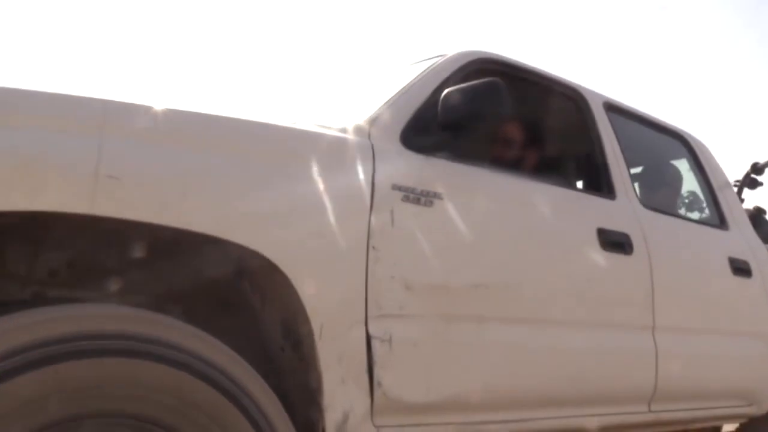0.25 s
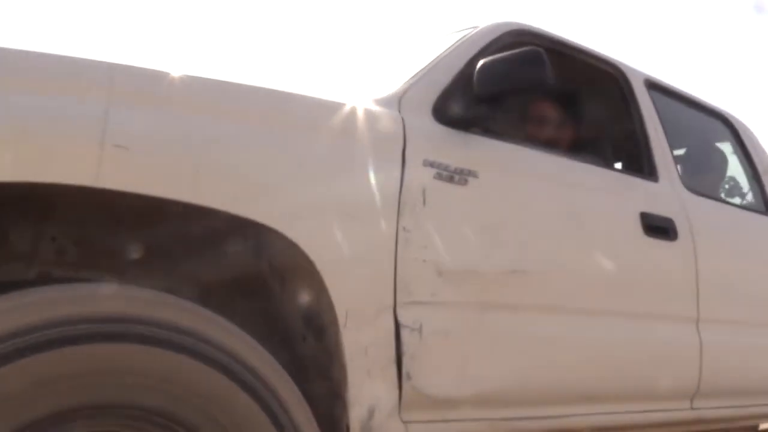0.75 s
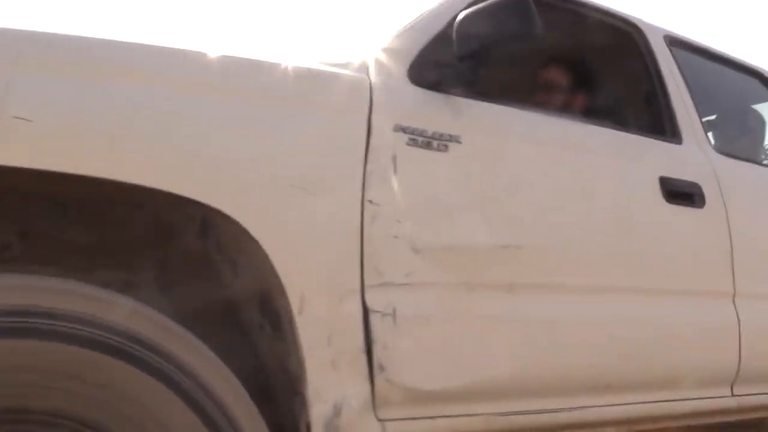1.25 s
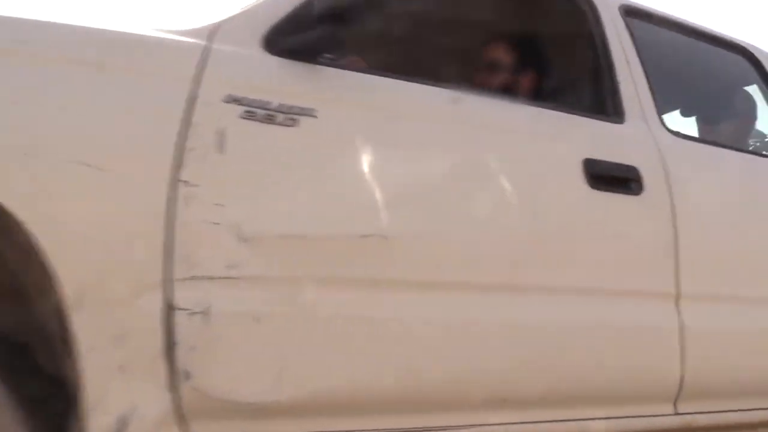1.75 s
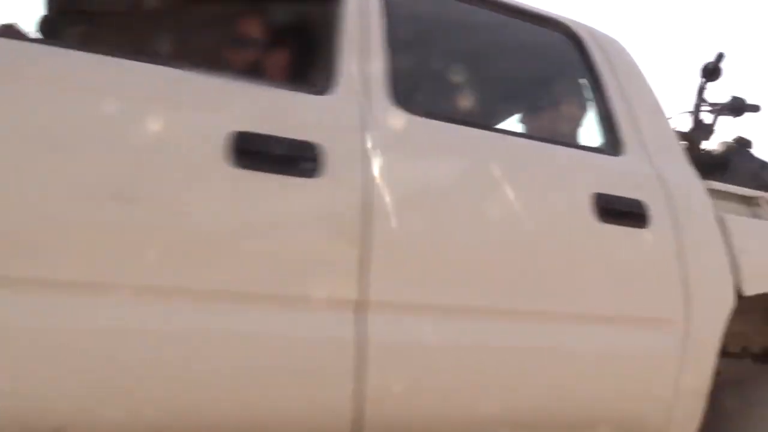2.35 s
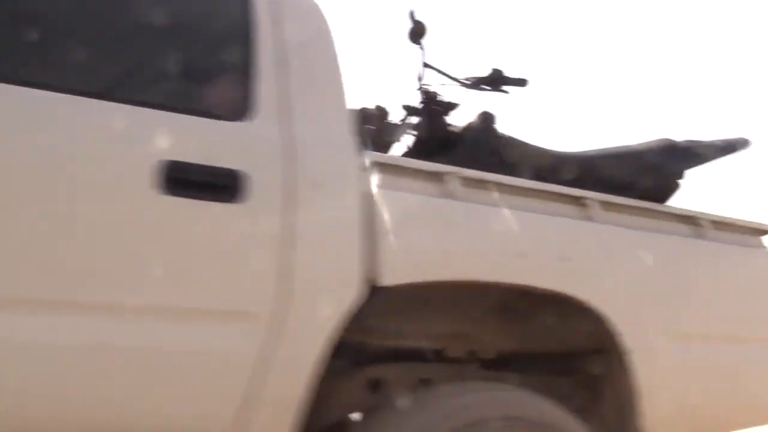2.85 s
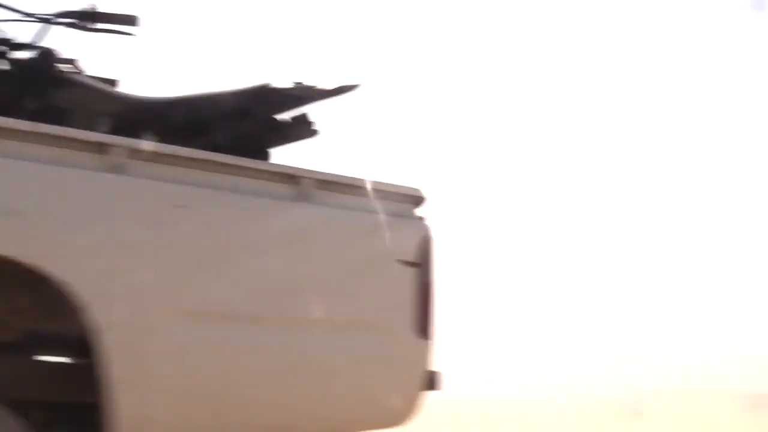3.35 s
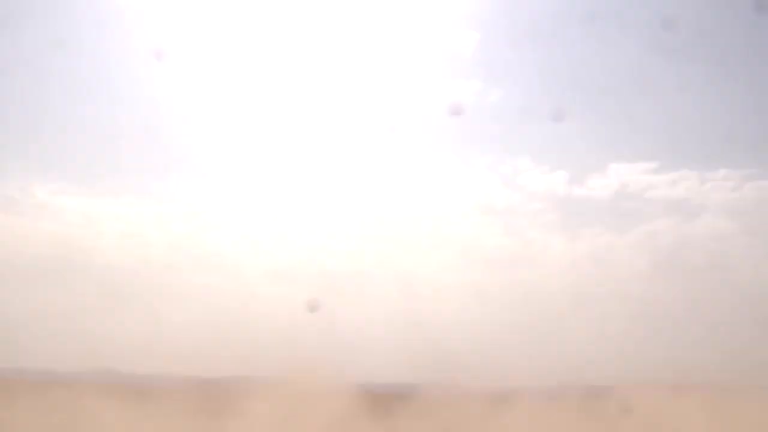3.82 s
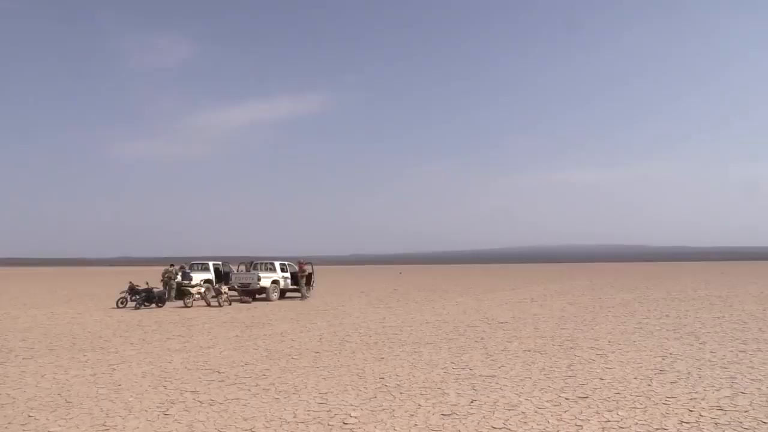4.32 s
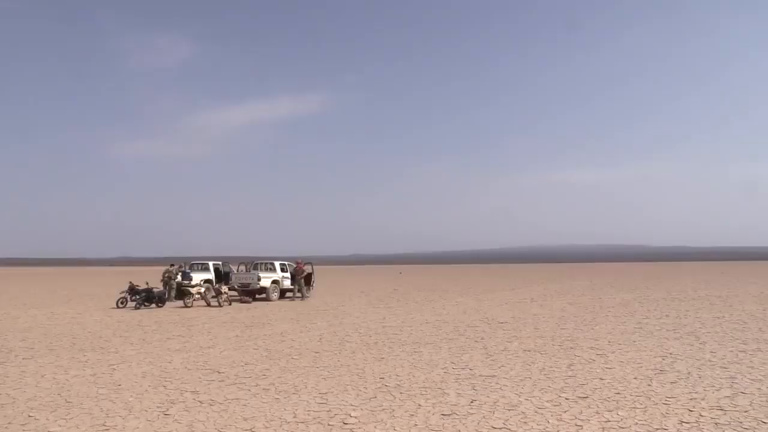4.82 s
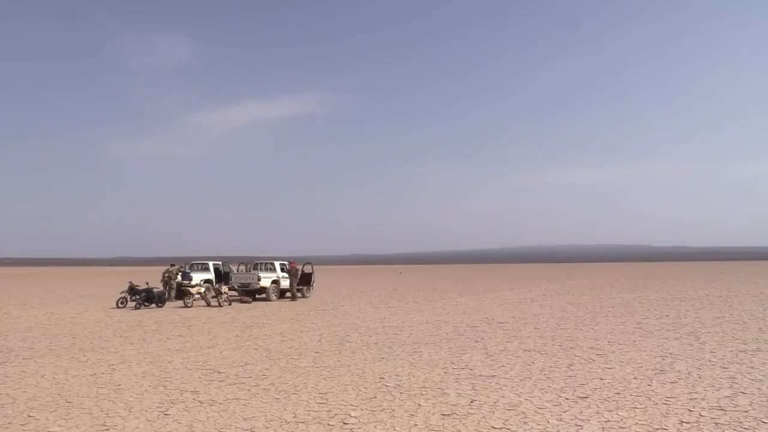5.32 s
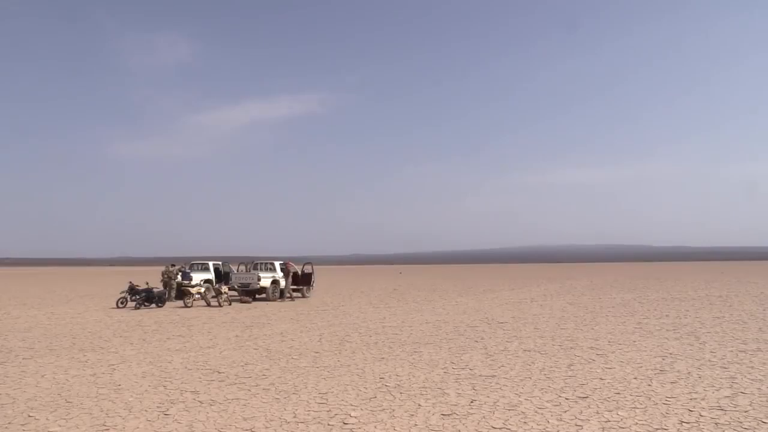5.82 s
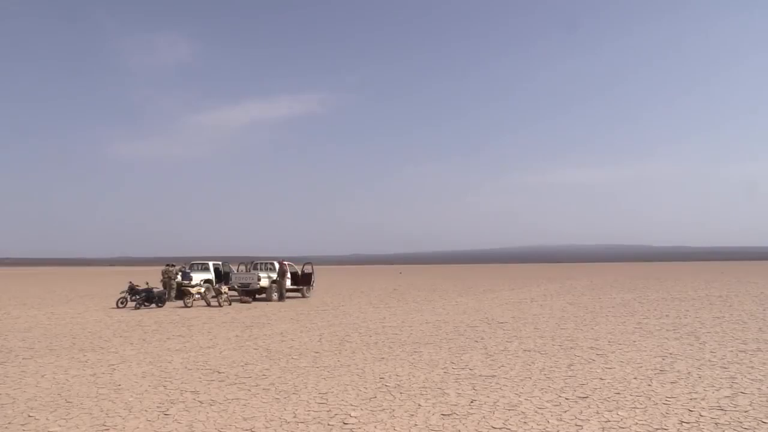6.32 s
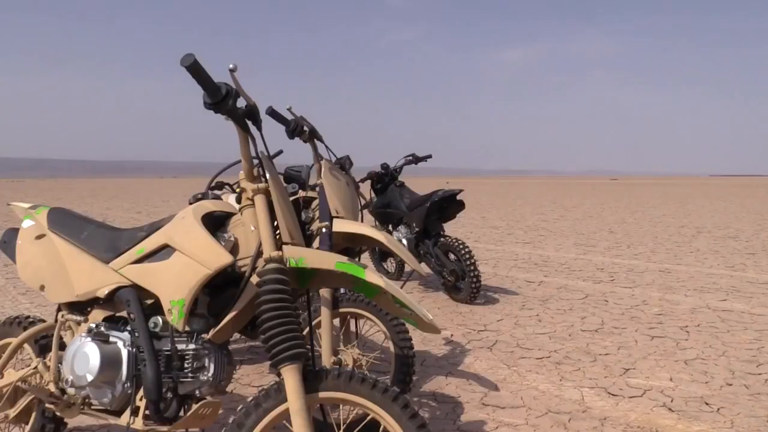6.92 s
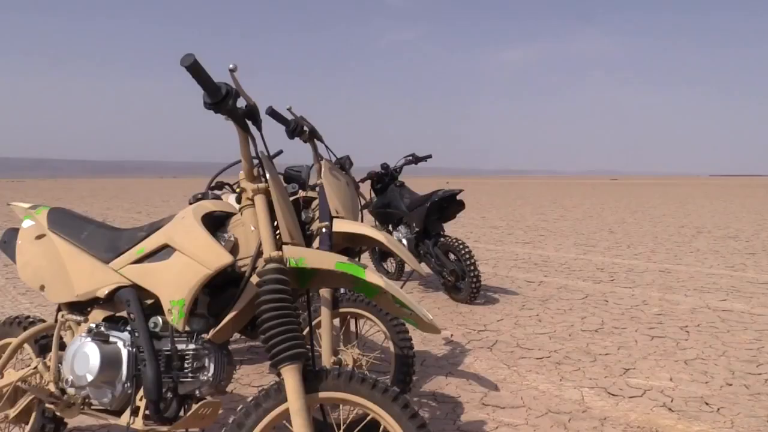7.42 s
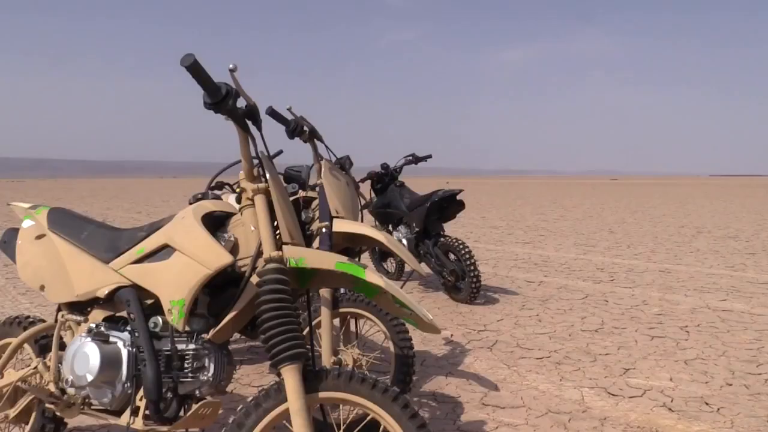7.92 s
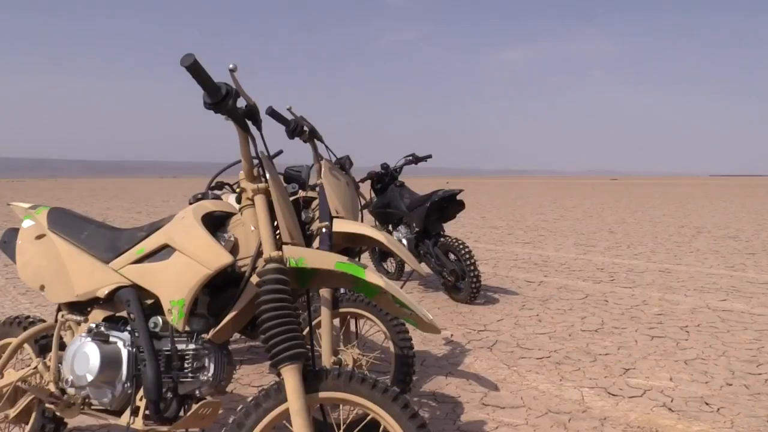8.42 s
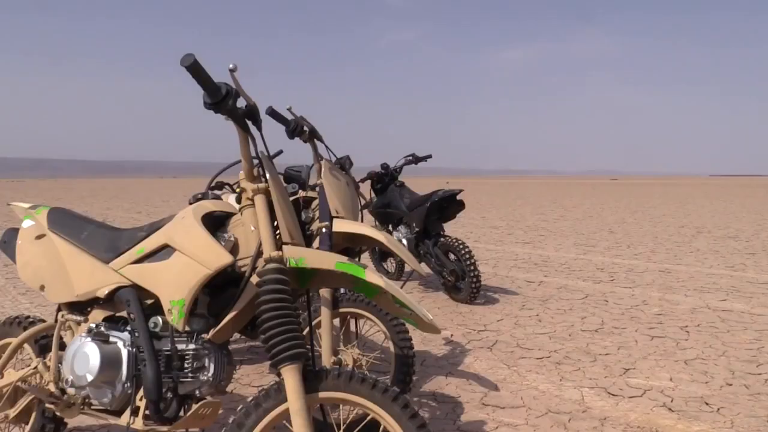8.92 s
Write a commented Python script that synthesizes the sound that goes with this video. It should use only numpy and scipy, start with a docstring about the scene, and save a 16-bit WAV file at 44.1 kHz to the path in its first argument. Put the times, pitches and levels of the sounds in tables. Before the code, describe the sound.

Overloaded rushing air batters a bare microphone, then low breeze and far diesel clatter with faint metal clinks, then bumpy gusts and close crackly rustles.

```python
"""Three scenes in open desert, joined by hard cuts. First, the rushing air of a fast drive overloads a bare
microphone: shaped noise is flattened at its peaks, and slaps of air make it swing. Then a steady breeze of
softer noise blows while a diesel idles far off, its bursts and taps ringing the metal; a loose part clinks
and thin tones pass. Last, the breeze comes in gusts and short low thumps over the fainter idle, and something
dry rustles and snaps close by. Short bands of noise, some gliding, pass in the last two scenes, several
colouring the rustle."""
import sys
import numpy as np
from scipy import signal
from scipy.io import wavfile
from scipy.ndimage import uniform_filter1d

SR = 44100
rng = np.random.default_rng(int(sys.argv[2]) if len(sys.argv) > 2 else 0)


def store_pcm(level_fs):
    """Save levels as 16-bit WAV."""
    pcm = np.round(np.clip(level_fs, -1, 1) * 32767).astype(np.int16)
    wavfile.write(sys.argv[1], SR, np.atleast_2d(pcm).T)


N = 403956

# The moments when one scene cuts to the next: t/s
CUT_TIMES = (4.03487, 6.87104)

# Steady air in the drive, the breeze and the gusty scene, before overload: t/s, rumble level/dB, hiss level/dB
DRIVE_AIR = [(0, -9, -35), (.5, -9.5, -34.5), (1.5, -11.5, -34), (2.3, -12, -34), (2.8, -12, -35.5),
             (3.5, -11, -39), (3.7, -9, -40), (4.035, -12, -44)]
BREEZE_AIR = [(4.04, -22.5, -53), (4.33, -23, -54.5), (4.45, -19.5, -54), (5.2, -19.5, -56),
              (5.8, -22, -54), (6.3, -23.5, -55.5), (6.87, -21, -53)]
GUSTY_AIR = [(6.87, -23.5, -50), (7.3, -23.5, -50.5), (7.6, -22.5, -49), (7.9, -27.5, -46),
             (8.45, -27, -48.5), (8.55, -41.5, -58), (8.68, -29, -60.5), (9.16, -32.5, -61)]
# Swells of the rumble over the steady air: peak t/s, rise/dB, time to rise/s
GUST_SWELLS = [(4.132, 4.5, 0.019), (4.602, -3.5, 0.064), (5.036, 2.5, 0.21), (5.588, 6, 0.044),
               (6.1, 5.5, 0.062), (6.725, 1.5, 0.043), (7.164, 6, 0.18), (7.422, 3.5, 0.058),
               (7.791, 8.5, 0.2), (8.036, 6.5, 0.15), (8.223, 4.5, 0.031), (8.379, 9, 0.058),
               (8.71, 0.5, .04), (8.788, 5.5, 0.096), (8.903, 0, 0.046)]
# Slow buffeting against the rumble, one value a scene: level/dB
BUFFET_LEVELS = (-13, -5.5, -2)
# Tone colour of the wind in each scene: f/Hz, level/dB per Hz
DRIVE_RUMBLE_COLOUR = [(16, -63), (43, 9), (92, -4), (172, -0.5), (225, 0.5), (341, -6.5), (480, -16.5),
                       (700, -19.5), (1000, -33.5)]
BREEZE_RUMBLE_COLOUR = [(12, -51), (20, -8), (69, -2.5), (129, -3), (204, -5), (413, -28.5), (511, -32),
                        (583, -31), (1000, -46), (1300, -73), (2200, -120)]
GUSTY_RUMBLE_COLOUR = [(12, -53), (20, -16), (81, -4), (186, 2), (330, -10.5), (491, -21.5), (644, -29.5),
                       (720, -25), (900, -34), (1170, -62), (1980, -120)]
# Tyres on grit and rushing air: f/Hz, level/dB per Hz
DRIVE_HISS_COLOUR = [(590, -14), (1000, -2.5), (2220, -15.5), (4780, -22.5), (5730, -25.5), (10000, -29),
                     (14500, -39.5), (15300, -41)]
# Far sound of the plain: f/Hz, level/dB per Hz
PLAIN_HISS_COLOUR = [(530, -58), (900, 6), (1200, -11.5), (1610, 1.5), (2050, -4.5), (3020, -11),
                     (4510, -12), (8070, -20.5), (14400, -26), (15300, -35)]
BUFFET_FOLLOWS = 1.73   # dB of buffeting for each dB of gust
GUST_FALL = 0.45   # a gust dies in this share of the time it took to rise

# The airstream breaks: middle t/s, length at half the dip/s, dip level/dB
AIR_LULLS = [(3.445, .006, -12), (3.607, .009, -12), (3.648, .017, -21.5), (3.706, .008, -12),
             (3.785, .006, -10), (3.8, .004, -15), (3.9, .008, -11), (3.945, .006, -10)]
# Strongest slaps of air in the drive, crowding in the wake of the passing truck: t/s, kick level/dB
AIR_SLAPS = [(.098, -5), (.189, -2), (.268, -7), (.384, -7), (.429, -7), (.457, -7), (.816, -6),
             (1.117, -7), (1.364, -5), (1.556, -5), (1.995, -5), (2.351, -7), (2.536, -7), (2.845, -7),
             (2.911, -7), (2.961, -7), (3.084, -7), (3.188, -7), (3.549, -4), (3.585, -4), (3.62, -8),
             (3.658, -6), (3.681, 1), (3.738, -4), (3.758, -4), (3.86, -4), (3.908, -4), (3.95, -7),
             (3.995, -4)]
BREAK_S, BREAK_DB = .006, -5   # dip of the air centred just before each slap: length at half the dip, depth
KICK_HZ, KICK_T60_S = 178.5, 0.073   # the capsule swings on after a kick
FLAP_HZ, FLAP_T60_S, FLAP_DB = 750, .011, -9   # the sharp front of a kick, against its swing

# Eddies that burst on the capsule, before overload: middle t/s, peak level/dB, f/Hz, length/s
EDDY_THUMPS = [(7.113, -9.5, 186, 0.049), (7.155, 4.5, 116, 0.011), (7.18, 2, 98, 0.011),
               (7.417, -8, 185, 0.007), (7.777, 6.5, 147, 0.018), (8.01, -7, 151, 0.026),
               (8.038, -12.5, 125, 0.067), (8.399, -5.5, 147, 0.026), (8.468, -13, 139, 0.022),
               (8.703, -8.5, 133.3, 0.014), (8.772, -12, 163, 0.031), (8.886, -7.5, 137, 0.014),
               (8.917, -10.5, 127, 0.014)]

# Swing at which the capsule runs out of travel, one value a scene: height (full scale = 1)
TRAVEL_LIMITS = (.42, .41, .69)
EDGE_HZ = 760   # the damped diaphragm dulls the rumble above this

# Tone colour of the rustle: f/Hz, level/dB per Hz
DRY_COLOUR = [(350, -37), (600, 15), (725, 4), (938, 4), (1470, 7), (2330, 0.5), (3450, -6.5), (3890, -9),
              (11400, -21), (15300, -40)]
# Strokes of the rustle: start t/s, length/s, level/dB, extra level of the body/dB
RUSTLE_STROKES = [(7.373, 0.063, -62, 15.5), (7.538, 0.026, -48, -1), (7.585, 0.19, -47, 3),
                  (7.708, 0.33, -43, 5), (7.853, 0.12, -64, 16.5), (8.058, 0.15, -55.5, 14),
                  (8.206, 0.12, -46, 6), (8.388, 0.017, -44, 7.5), (8.428, 0.088, -49, 3),
                  (9.13, .1, -53.5, 8.5)]
STROKE_RISE, STROKE_FALL_S = 0.33, 0.019   # share of the stroke spent swelling; lead-in and release time
# Short clicks: the first is the click of the second cut, the rest are dry snaps:
# t/s, level before the low end is thinned/dB
CLICKS = [(6.8712, -37), (7.1576, -41), (7.181, -42), (7.4, -48), (7.476, -41), (7.4874, -43),
          (7.5024, -45), (7.5288, -39), (7.5427, -40), (7.6564, -40), (8.3853, -52), (8.9523, -49)]
CLICK_T60_S, CLICK_HZ = 0.0097, 2500   # decay; a click is thin below this pitch

IDLE_CYCLE_HZ = 6.158   # engine cycles a second, four firings each
# First firing used in the second and third scene: t/s
FIRST_FIRINGS = (4.0155, 6.8735)
# The engine against the far hiss in the second and third scene: level/dB
IDLE_LEVELS = (0, -3)
# Ringing modes of the engine block: f/Hz, time to fall 60 dB/s
BLOCK_MODES = [(1380, .013), (1620, .016), (1960, .018), (2250, .012), (2650, .01)]
# How hard each cylinder strikes the block, a row a cylinder: one level/dB for each mode
CYLINDER_STRIKES = [(4.5, 6, 14.7, 3.6, -1), (4.5, 10.8, 4.8, 4.6, -1), (6, 14.4, 6, 7.6, 0),
                    (4.6, 6.4, 4.3, 4, -2)]
KNOCK_DB, KNOCK_T60_S = -23.5, 0.18   # combustion knock sent into the block, and its decay
# Ringing modes of the valve gear: f/Hz, level/dB, time to fall 60 dB/s
VALVE_MODES = [(4540, -2, .028), (3900, -4, .015), (4950, -5, .015), (5850, -8, .015), (6500, -10, .012),
               (7150, -14, .025)]
# Strength of the tap at each cylinder's firing: level/dB
VALVE_TAPS = (-5, 1, -3, 10)
VALVE_FADE_DB_PER_S, VALVE_SPREAD_DB = 6, 2.5   # the taps sink through each scene and vary by chance

# A loose metal part is shaken and rings faintly: t/s, level/dB
METAL_TOUCHES = [(4.55, -69), (4.76, -69), (4.95, -68), (5.115, -68), (5.36, -68), (5.645, -66),
                 (5.85, -67), (5.95, -65), (6.2, -67), (6.505, -67), (6.7, -69)]
# Ringing modes of the loose part: f/Hz, level/dB, time to fall 60 dB/s
METAL_MODES = [(2820, -3, 1), (3290, -4, .9), (3560, -5, .9), (3750, -6, .8), (4100, -3, 1.1),
               (4460, -2, 1.2), (4700, -5, .8), (5250, -5, .9), (5430, -5, .9), (5600, -5, .7)]
SHAKE_S = .035   # each touch rattles this long
BLUR_T60_S = .12   # moving air blurs each line to this ring

# Short bands of noise: whooshes, streaks in the rustle, overtones of an overloaded thump:
# start t/s, length/s, start f/Hz, end f/Hz, rough width/Hz, level/dB
NOISE_BANDS = [(5.924, 0.08, 4700, 4500, 860, -50), (7.142, 0.075, 500, 1000, 710, -36),
               (7.21, .04, 1400, 1400, 300, -45.5), (6.7, 0.284, 270, 310, 210, -31),
               (7.8, .26, 4850, 4700, 500, -52), (7.72, 0.17, 3500, 3450, 350, -46.5),
               (7.85, 0.23, 1300, 1550, 300, -41), (7.8, 0.23, 2800, 2200, 1300, -40.5),
               (7.954, 0.167, 480, 500, 170, -33.5), (7.775, 0.0098, 520, 630, 400, -29),
               (8.0, 0.255, 1550, 1500, 250, -47), (6.865, 0.14, 1700, 1500, 1500, -50)]
# Brief thin tones: squeaks, and single ringing lines of the loose metal part:
# t at half height/s, length at half height/s, f/Hz, level/dB
THIN_TONES = [(4.05, .06, 3900, -63), (4.275, 0.066, 3500, -61), (4.5, .045, 3300, -65),
              (4.55, .14, 5600, -68), (4.565, .025, 2800, -59), (4.77, .23, 5250, -66),
              (5.09, .16, 4450, -65), (4.898, .05, 3420, -60), (5.47, .03, 4050, -59),
              (5.668, .14, 4100, -65), (5.7, 0.073, 5350, -64), (5.94, .045, 3520, -55),
              (5.97, 0.05, 5100, -61), (5.99, .1, 3270, -61), (6.152, 0.1, 3430, -59),
              (6.51, .09, 5500, -64)]

COUPLING_HZ, CUTOFF_HZ = 35.2, 15300   # low and high limits of the recorded sound


def amp(db):
    """Turn decibels into gain."""
    return 10 ** (np.asarray(db) / 20)


def rms_one(x):
    """Scale a sound to an rms (average strength) of 1."""
    return x / np.sqrt(np.mean(x ** 2) + 1e-20)


def in_time(rows, t):
    """Read the columns of a curve table at times t."""
    s, *columns = np.transpose(rows)
    return [np.interp(t, s, column) for column in columns]


def drift(rate_hz, size):
    """Slow random wandering of rms 1: coarse noise smoothed twice, at one point every 20 samples."""
    r = np.exp(-40 * np.pi * rate_hz / SR)
    coarse = rng.standard_normal(size // 20 + 2002)
    slow = signal.lfilter([1], [1, -2 * r, r * r], coarse)[2000:]   # drop the settling time
    return np.interp(np.arange(size) / 20, np.arange(len(slow)), rms_one(slow))


def decay(x, t60):
    """Let every input die away smoothly, falling 60 dB in t60 seconds."""
    return signal.lfilter([1], [1, -amp(-60 / (t60 * SR))], x + 1e-18)


def ring(clicks, hz, t60):
    """A resonance: a click of height 1 starts a dying sine of height 1."""
    r, w = amp(-60 / (t60 * SR)), 2 * np.pi * hz / SR
    return signal.lfilter([0, np.sin(w)], [1, -2 * r * np.cos(w), r * r], clicks + 1e-18)


def hump(t, centre, reach):
    """Smooth bump of height 1, falling to zero at reach seconds on either side."""
    return np.cos(np.pi * np.clip((t - centre) / reach / 2, -.5, .5)) ** 2


def bands(white, colour, low_hz, high_hz, shared_db, patchy_db, patch_rate):
    """Colour two noises, used in turn, in third-octave bands that flicker together and alone; rms 1."""
    edges = np.geomspace(low_hz, high_hz, round(3 * np.log2(high_hz / low_hz)) + 1)
    hz, db = np.transpose(colour)
    out = 0
    for k, (low, high) in enumerate(zip(edges, edges[1:])):
        band_filter = signal.butter(2, [low, high], "band", fs=SR, output="sos")
        band = signal.sosfilt(band_filter, white[k % 2])
        level_db = np.interp(np.log(low * high) / 2, np.log(hz), db)
        flicker_db = shared_db + patchy_db * drift(patch_rate, len(band))
        out = out + amp(level_db + flicker_db) * band
    return rms_one(out)


def wind(t, air, buffet_db, colour, hiss_colour, lumpy_db, lump_rate, hiss_follows):
    """Turbulent air is noise whose eddies swell rumble and hiss together; also returns the hiss level."""
    rumble_db, hiss_db = in_time(air, t)
    gust_db = 0
    for s, rise_db, rise_s in GUST_SWELLS:
        gust_db = gust_db + rise_db * hump(t, s, np.where(t < s, rise_s, GUST_FALL * rise_s))
    eddies_db = lumpy_db * drift(lump_rate, len(t))
    white = rng.standard_normal((2, len(t)))
    buffet = bands(white, colour, 15.9, 84.4, 0.15 * eddies_db, patchy_db=3.5, patch_rate=4.2)
    rumble = bands(white, colour, 79.5, 985, eddies_db, patchy_db=1.0, patch_rate=10.3)
    hiss = bands(white, hiss_colour, 682, 16060, hiss_follows * eddies_db, patchy_db=0.94, patch_rate=4.1)
    low = amp(buffet_db + BUFFET_FOLLOWS * gust_db) * buffet + amp(gust_db) * rumble
    return amp(rumble_db) * low, amp(hiss_db) * hiss, hiss_db


def kicks(t):
    """Each slap throws the diaphragm one way or the other: a low ringing swing and a sharper front."""
    clicks = np.zeros(len(t))
    s, db = np.transpose(AIR_SLAPS)
    clicks[(s * SR).astype(int)] = amp(db) * rng.choice([-1, 1], (len(s), 1))[:, 0]
    swing = ring(clicks, KICK_HZ, KICK_T60_S)
    front = ring(uniform_filter1d(clicks, size=16), FLAP_HZ, FLAP_T60_S)
    return swing, amp(FLAP_DB) * front


def lulls(t):
    """Gain of the airstream: it drops in each lull and lets go around each slap."""
    lull_db = sum(db * hump(t, s, length) for s, length, db in AIR_LULLS)
    break_db = sum(BREAK_DB * hump(t, s - BREAK_S / 2, BREAK_S) for s, _ in AIR_SLAPS)
    return amp(lull_db) * amp(break_db)


def thumps(t):
    """Each bursting eddy is a short pressure wave that pushes or pulls by chance."""
    signs = rng.choice([-1, 1], (len(EDDY_THUMPS), 1))
    out = 0
    for (s, db, hz, length), sign in zip(EDDY_THUMPS, signs):
        wave = np.sin(2 * np.pi * hz * (t - s) + 1.82)
        out = out + amp(db) * hump(t, s, length / 2) * sign * wave
    return out


def capsule(rumble, limit):
    """Big swings flatten at the end of travel; the damped diaphragm rounds the corners."""
    flat = rumble / (1 + np.abs(rumble / limit) ** 6) ** (1 / 6)
    return signal.sosfilt(signal.butter(1, EDGE_HZ, fs=SR, output="sos"), flat)


def rustle(t):
    """Dry rubbing is many uneven tiny grains in clumps; each stroke swells, holds and stops short."""
    top_gain = body_gain = 0
    for s, length, db, body_db in RUSTLE_STROKES:
        corners = [s - STROKE_FALL_S, s + STROKE_RISE * length, s + length, s + length + STROKE_FALL_S]
        shape = np.interp(t, corners, [0, 1, 1, 0])
        top_gain = top_gain + amp(db) * shape
        body_gain = body_gain + amp(db + body_db) * shape
    born = rng.random((2, len(t))) < 6000 / SR   # about 6000 grains a second in each noise
    grain_db = 2.9 * np.minimum(rng.exponential(1, born.shape), 5)
    grains = born * amp(grain_db) * rng.choice([-1, 1], born.shape)
    clumps_db = 1.3 * drift(52, len(t))
    body = bands(grains, DRY_COLOUR, 500, 3150, clumps_db, patchy_db=2.4, patch_rate=12)
    top = bands(grains, DRY_COLOUR, 2500, 16000, clumps_db, patchy_db=1.5, patch_rate=15)
    return top_gain * top + body_gain * body


def short_clicks(t):
    """Each click is a very short burst of bright noise."""
    starts = sum(amp(db) * (np.arange(len(t)) == round((s - t[0]) * SR)) for s, db in CLICKS)
    burst = decay(starts, CLICK_T60_S) * rng.standard_normal(len(t))
    return signal.sosfilt(signal.butter(1, CLICK_HZ, "high", fs=SR, output="sos"), burst)


def firing_times(t, first):
    """Evenly spaced firings, four to an engine cycle."""
    return np.arange(first, t[-1] - .01, 1 / IDLE_CYCLE_HZ / 4)


def diesel(t, first, level_db, spread_db):
    """Each firing sends a burst of noisy knock into the block; each cylinder favours its own modes."""
    times = firing_times(t, first)
    chance = rng.standard_normal((len(times), len(BLOCK_MODES) + 1))
    uneven_times = times + .0025 * chance[:, -1]
    at = np.clip((uneven_times - t[0]) * SR, 0, len(t) - 1).astype(int)
    strength_db = np.resize(CYLINDER_STRIKES, (len(times), len(BLOCK_MODES))) + spread_db * chance[:, :-1]
    knock = rms_one(rng.standard_normal(len(t)))
    out = 0
    for k, (hz, t60) in enumerate(BLOCK_MODES):
        starts = np.zeros(len(t))
        starts[at] = amp(strength_db[:, k])
        burst = decay(starts, KNOCK_T60_S)   # combustion dies away
        burst = uniform_filter1d(burst, size=300)   # distance blurs the onset
        out = out + ring(amp(KNOCK_DB) * burst * knock, hz, t60)
    return amp(level_db) * out


def valves(t, first, level_db):
    """A click with each firing rings the valve gear as a bright tap, strongest on one cylinder."""
    times = firing_times(t, first)
    tap_db = np.resize(VALVE_TAPS, len(times)) - VALVE_FADE_DB_PER_S * (times - first)
    chance = rng.standard_normal((len(times), len(VALVE_MODES) + 1))
    at = ((times + .0015 + .001 * chance[:, -1] - t[0]) * SR).astype(int)
    inside = at > 0
    out = 0
    for k, (hz, db, t60) in enumerate(VALVE_MODES):
        clicks = np.zeros(len(t))
        clicks[at[inside]] = amp(tap_db + db + VALVE_SPREAD_DB * chance[:, k])[inside]
        soft_tap = ring(clicks, hz, .012) / 40   # distance softens the tap
        out = out + ring(soft_tap, hz, t60)
    return amp(level_db) * out


def clinks(t):
    """Each touch is a short rattle that wakes every mode by chance; the lines waver as they die."""
    chance_db = rng.normal(0, 3.0, (len(METAL_TOUCHES), len(METAL_MODES)))
    out = 0
    for k, (hz, mode_db, t60) in enumerate(METAL_MODES):
        push = 0
        for (s, db), own_db in zip(METAL_TOUCHES, chance_db[:, k]):
            push = push + amp(db + mode_db + own_db) * hump(t, s + SHAKE_S / 2, SHAKE_S / 2)
        dying = decay(2 / (SHAKE_S * SR) * push, t60)
        line = rms_one(ring(rng.standard_normal(len(t)), hz, BLUR_T60_S))
        out = out + dying * line
    return out


def noise_bands(t):
    """A band of noise in a short window, its centre pitch held or gliding."""
    out = 0
    for s, length, start_hz, end_hz, width_hz, db in NOISE_BANDS:
        centre_hz = np.interp(t, [s, s + length], [start_hz, end_hz])
        phase = 2 * np.pi * np.cumsum(centre_hz) / SR
        noise = drift(width_hz / 2, len(t)) * np.cos(phase) + drift(width_hz / 2, len(t)) * np.sin(phase)
        out = out + amp(db) * hump(t, s + length / 2, 0.48 * length) * noise
    return out


def thin_tones(t, t60):
    """Noise passed twice through a resonance, in short windows; a longer t60 makes it thinner."""
    white = rng.standard_normal(len(t))
    out = 0
    for s, length, hz, db in THIN_TONES:
        tone = rms_one(ring(ring(white, hz, t60), hz, t60))
        out = out + amp(db) * hump(t, s + length / 2, length) * tone
    return out


def scene():
    """Join the drive, the breeze and the gusts; each has its own air, and the joins are not smoothed."""
    drive_t, breeze_t, gust_t = np.split(np.arange(N) / SR, [round(c * SR) for c in CUT_TIMES])

    rumble, hiss, _ = wind(drive_t, DRIVE_AIR, BUFFET_LEVELS[0], DRIVE_RUMBLE_COLOUR, DRIVE_HISS_COLOUR,
                           lumpy_db=3.0, lump_rate=42, hiss_follows=.25)
    swing, front = kicks(drive_t)
    lull = lulls(drive_t)
    drive = capsule(rumble * lull + swing, TRAVEL_LIMITS[0]) + front + hiss * lull

    rumble, hiss, far_db = wind(breeze_t, BREEZE_AIR, BUFFET_LEVELS[1], BREEZE_RUMBLE_COLOUR,
                                PLAIN_HISS_COLOUR, lumpy_db=1.0, lump_rate=7.2, hiss_follows=.1)
    breeze = capsule(rumble, TRAVEL_LIMITS[1]) + hiss
    breeze = breeze + diesel(breeze_t, FIRST_FIRINGS[0], far_db + IDLE_LEVELS[0], spread_db=2.0)
    breeze = breeze + valves(breeze_t, FIRST_FIRINGS[0], far_db)
    breeze = breeze + thin_tones(breeze_t, t60=0.016) + clinks(breeze_t)

    rumble, hiss, far_db = wind(gust_t, GUSTY_AIR, BUFFET_LEVELS[2], GUSTY_RUMBLE_COLOUR,
                                PLAIN_HISS_COLOUR, lumpy_db=2.0, lump_rate=21, hiss_follows=.1)
    gusts = capsule(rumble + thumps(gust_t), TRAVEL_LIMITS[2]) + hiss
    gusts = gusts + diesel(gust_t, FIRST_FIRINGS[1], far_db + IDLE_LEVELS[1], spread_db=1.5)
    gusts = gusts + valves(gust_t, FIRST_FIRINGS[1], far_db + 2 * IDLE_LEVELS[1])
    gusts = gusts + rustle(gust_t) + short_clicks(gust_t)

    joined = np.concatenate([drive, breeze, gusts])
    return (joined + noise_bands(np.arange(N) / SR))[None]


def record(dry):
    """The coupling capacitor tilts the flat tops; a steep filter cuts the highest treble."""
    coupled = signal.lfilter(*signal.butter(1, COUPLING_HZ, "high", fs=SR), dry)
    return signal.sosfilt(signal.ellip(8, .5, 40, CUTOFF_HZ, fs=SR, output="sos"), coupled)


dry = scene()
out = record(dry)
store_pcm(out)
```